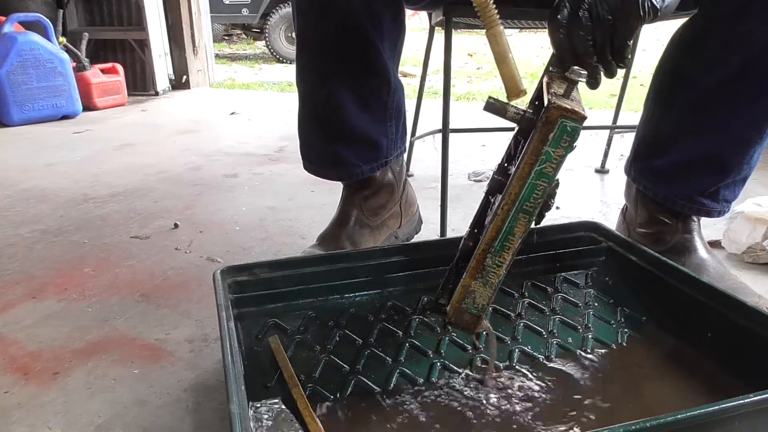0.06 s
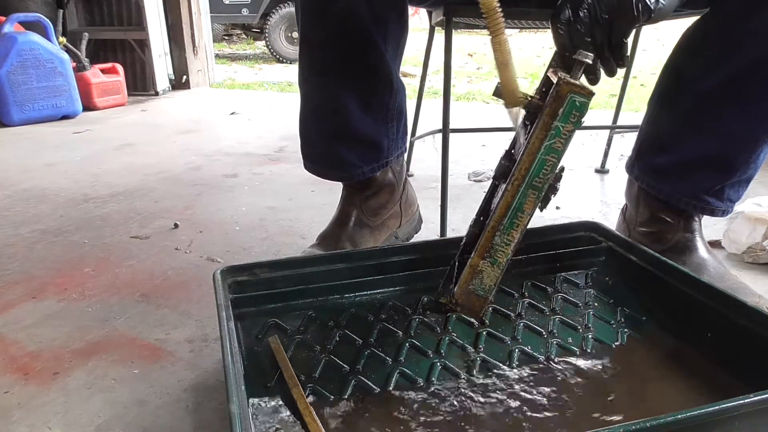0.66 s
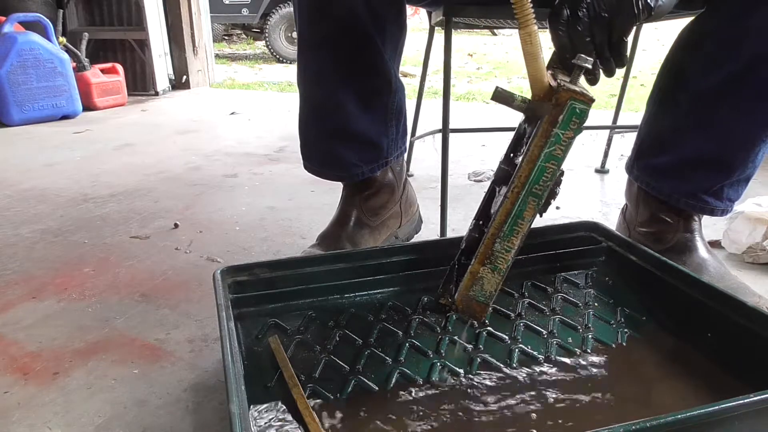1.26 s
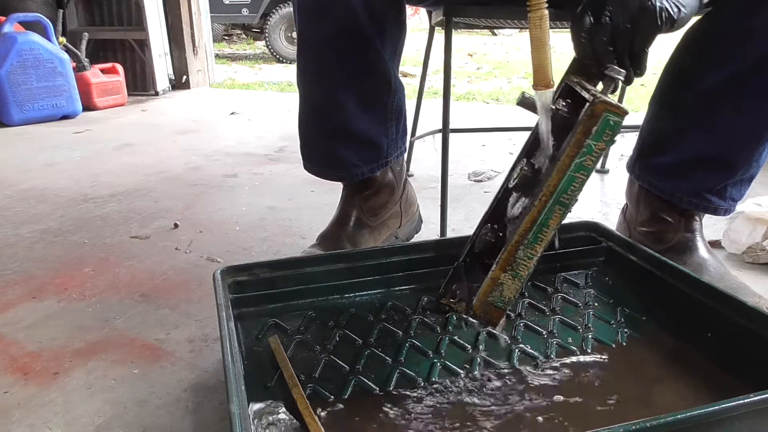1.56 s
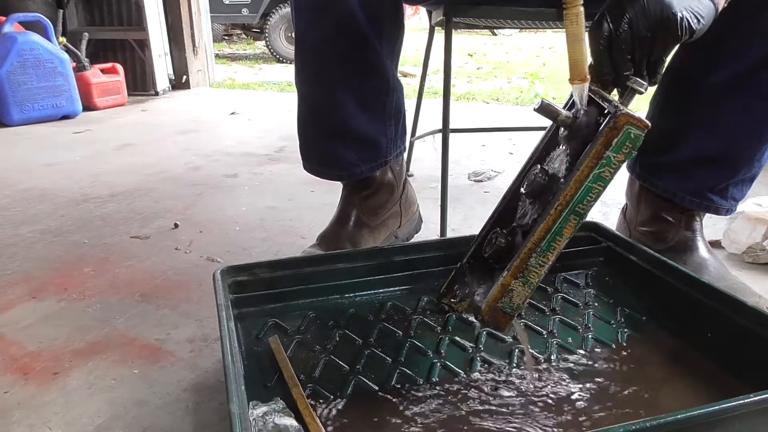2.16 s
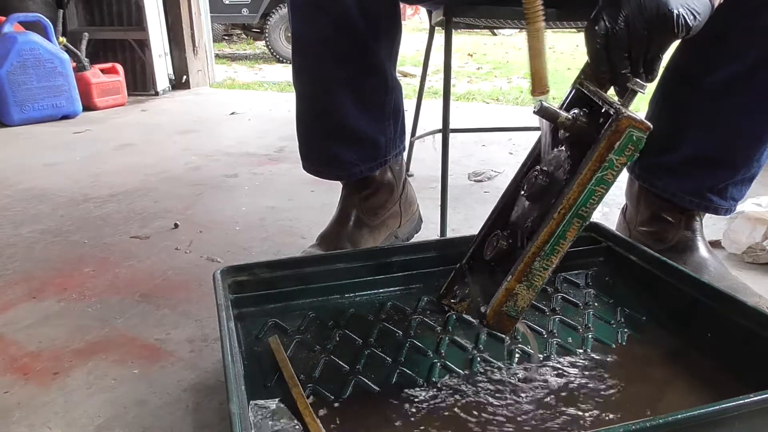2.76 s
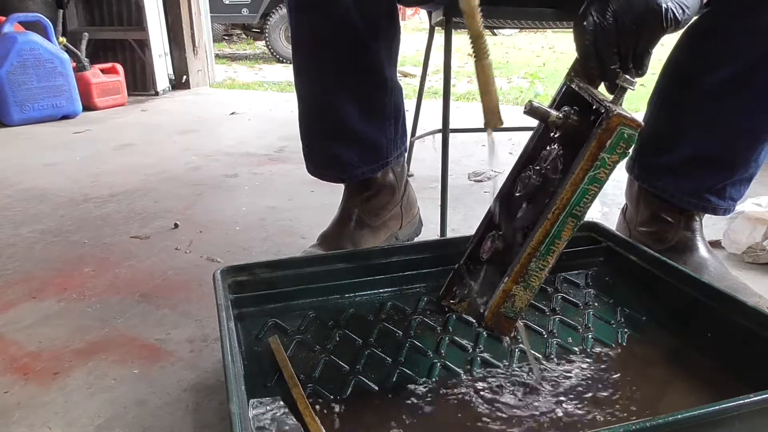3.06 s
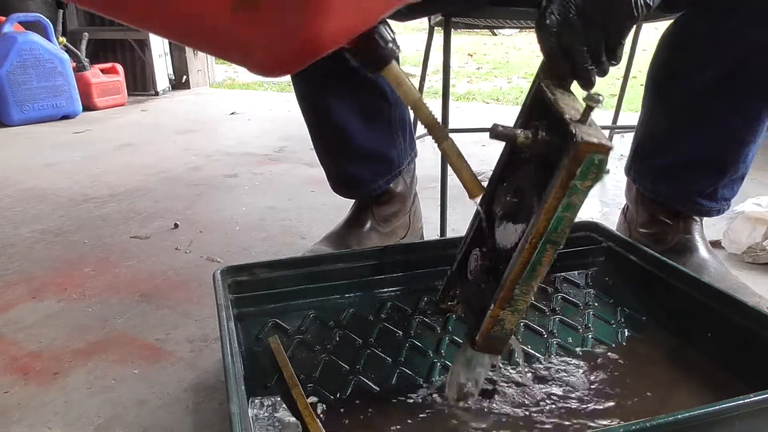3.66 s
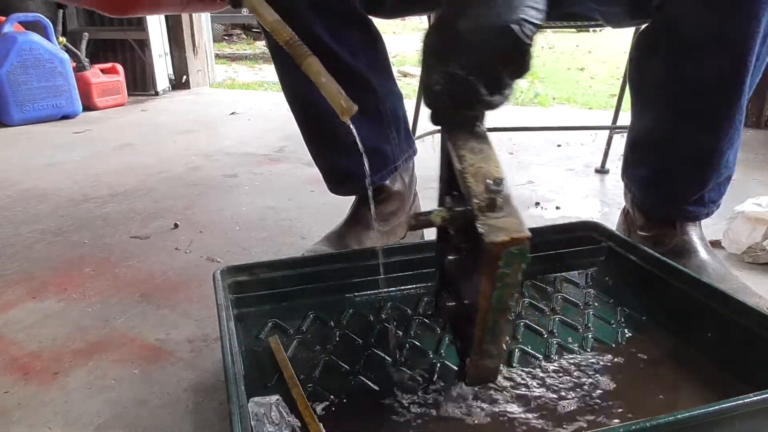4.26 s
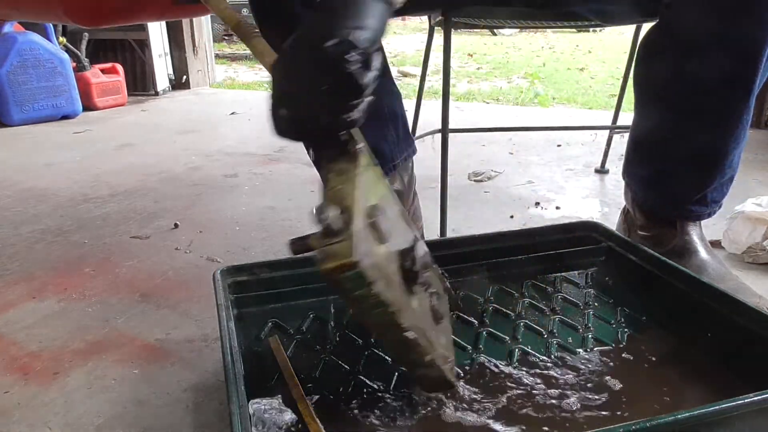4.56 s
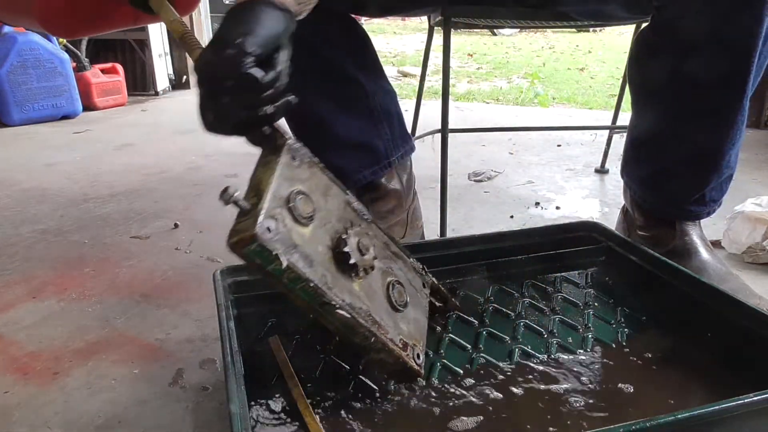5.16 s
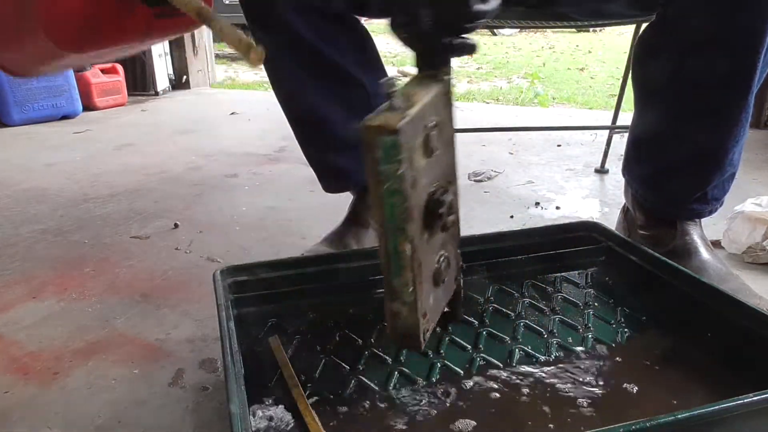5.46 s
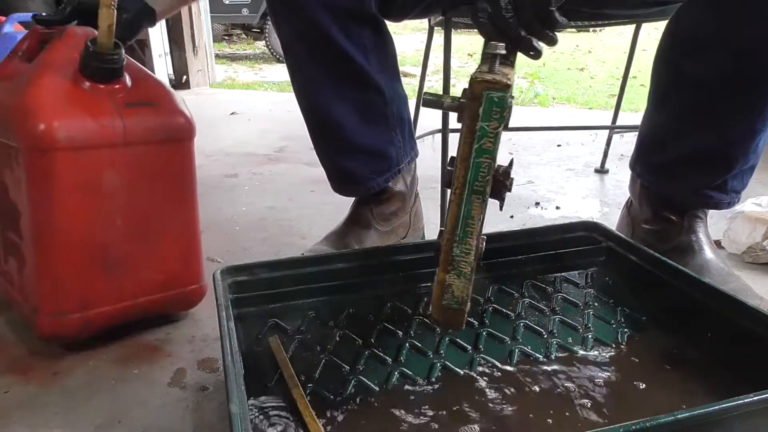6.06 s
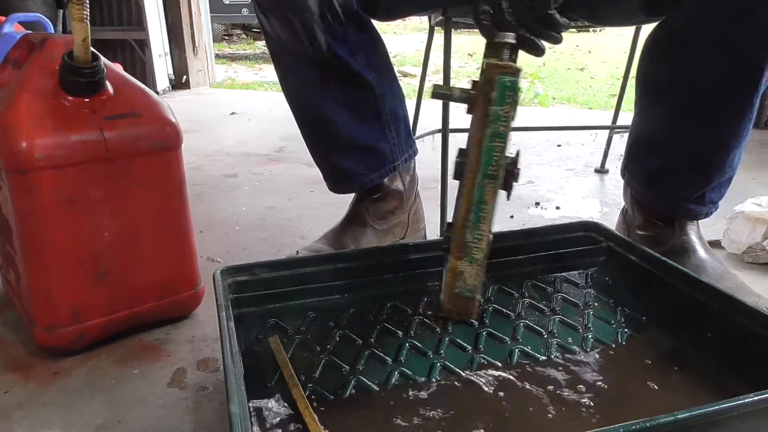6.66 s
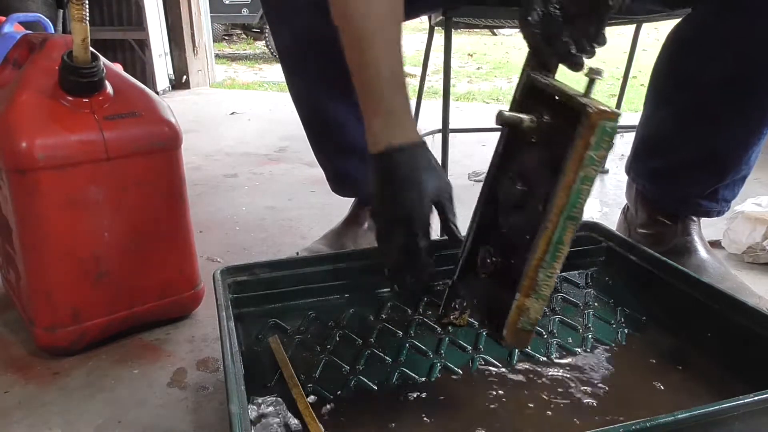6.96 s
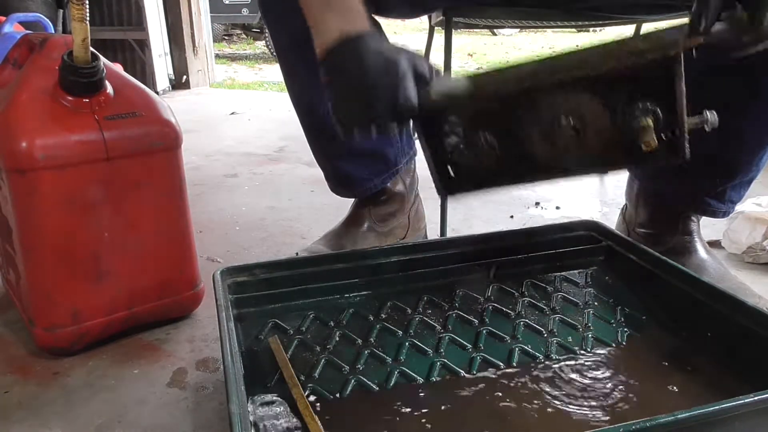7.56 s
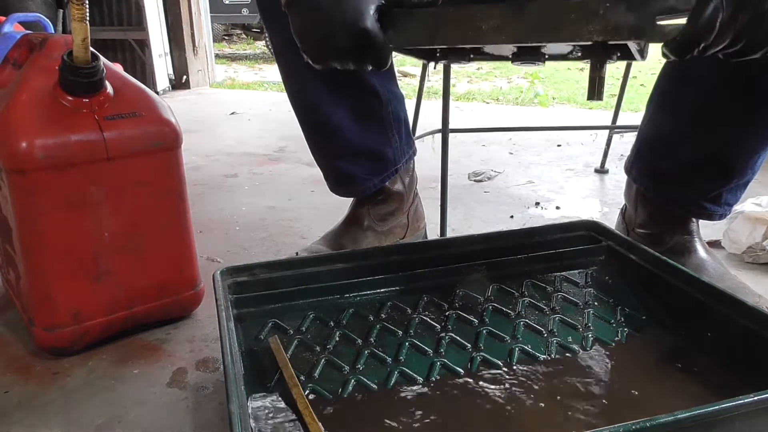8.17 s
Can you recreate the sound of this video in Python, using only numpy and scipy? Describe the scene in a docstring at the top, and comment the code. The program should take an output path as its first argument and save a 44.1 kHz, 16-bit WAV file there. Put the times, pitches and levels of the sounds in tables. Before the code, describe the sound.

From the start, solvent pours from a plastic can onto a steel plate and spatters into a plastic drain tray, close to the microphone in an open garage. The fine, bright splashing comes in uneven gushes with sharp little drips, and air glugs at about 1.2 seconds. Around 4 seconds the stream briefly drums on the plastic amid a few light knocks, then ends just before 5 seconds. The plate bumps the tray at 5.5 seconds. At 6 seconds the half-full can lands on gritty concrete with a loud, hollow clatter, rocking for half a second. Gloves and clothes rustle softly. The plate hits the tray with a loud knock and clink at 7.3 seconds, a drop plinks at 7.7, and another sharp knock comes at 8. A faint electrical hum, low outdoor air and a distant engine drone lie underneath throughout.

```python
"""Solvent runs from a plastic fuel can over a gearbox plate and spatters into a plastic drain tray.
Close to a stereo microphone in an open garage, it sprays, rings the steel and traps bubbles; air glugs
back into the can. The plate knocks the tray, gloves and clothes rub, and the can is set down on the
concrete with a hollow clatter. The garage answers faintly; mains hum and a far engine lie underneath."""
import sys
import numpy as np
from scipy import signal
from scipy.fft import rfft, irfft, next_fast_len
from scipy.io import wavfile
from scipy.ndimage import map_coordinates

SR = 44100
rng = np.random.default_rng(int(sys.argv[2]) if len(sys.argv) > 2 else 0)


def store_wav(level_fs):
    """Save 16-bit WAV to argv[1]."""
    pcm = np.round(np.clip(np.atleast_2d(level_fs), -1, 1) * 32767)
    wavfile.write(sys.argv[1], SR, pcm.T.astype(np.int16))


N = 371097
TIME_S = np.arange(N) / SR
HOLLOW_WIDTH, KNOCK_WIDTH, CAN_WIDTH, ROOM_WIDTH = 0.27, 0.55, 0.53, 0.88  # 0 is mono, 1 is full width
STREAM_ENDS_S = (4.83, 4.93)  # the last of the solvent thins out

# the steady stream, on the plate and in its hollow: time_s, spray_db, hollow_db
STREAM_LEVELS = [(0.0, -61.5, -71.5), (0.65, -66.5, -72.5), (1.13, -61.5, -70), (1.66, -60, -63.5),
                 (1.91, -53.5, -56.5), (2.12, -59.5, -61.5), (2.37, -59.5, -63.5), (2.99, -58, -63.5),
                 (3.4, -57, -58), (3.63, -61.5, -63.5), (3.82, -59.5, -60), (4.35, -65, -65.5),
                 (5.0, -70.5, -69)]
# gushes from the can: crest_s, rise_s, spray_lift_db, hollow_lift_db
STREAM_GUSHES = [(0.41, 0.029, 4.5, 1), (0.78, 0.02, 11, -3), (0.89, 0.035, 4.5, 2), (1.055, 0.0062, 9, -4),
                 (1.115, 0.028, 3.5, 5), (1.55, 0.033, 6.5, 6), (1.779, 0.03, 9, 6.5),
                 (1.95, 0.039, -1, -0.5), (2.07, 0.037, 3.5, 2.5), (2.3, 0.03, 7, 6), (2.387, 0.019, 9, 3),
                 (2.468, 0.031, 10, 6), (2.65, 0.049, 4.5, 6.5), (2.82, 0.079, 6, 1.5),
                 (2.92, 0.051, 4.5, 10.5), (3.04, 0.038, 6.5, 7.5), (3.24, 0.02, 4.5, -2),
                 (3.77, 0.047, 7.5, 1.5), (3.915, 0.03, 7, 3)]
# fine spray off the plate: frequency_hz, level_db
SPRAY_SPECTRUM = [(2200, -43), (3200, -13), (4600, -6.5), (6300, -5.5), (8100, 2.5), (10100, -0.5),
                  (11600, 0), (13600, -4), (15200, -16), (16000, -33)]
# the hollow of the gearbox housing: frequency_hz, level_db
HOLLOW_SPECTRUM = [(1400, -26), (1900, -12), (2150, 0), (2450, -8), (3150, 4), (3550, 2), (4050, 3),
                   (4900, 3.5), (6200, -15)]
# the churned pool in the tray: frequency_hz, level_db
POOL_SPECTRUM = [(190, -12), (320, -6), (390, -2.5), (520, -8), (680, -22.5), (980, -13.5), (1300, -9),
                 (1800, -19), (3000, -23), (5000, -31)]
def pour():
    """Close up, the stream sprays off the plate, slaps and rings its hollow and churns the pool."""
    # after each gush air re-enters the can and the stream slackens
    gushes = np.array([swell(s, rise, 1.18 * rise) - 0.31 * swell(s + 3 * rise, rise, rise)
                       for s, rise, _, _ in STREAM_GUSHES])
    lifts_db = np.transpose(STREAM_GUSHES)[2:] @ gushes
    spray_db, hollow_db = curves(STREAM_LEVELS) + lifts_db
    pool_db = -63.5 + 0.7 * (hollow_db - hollow_db.mean())
    fine = grain_pair(2470, 15700, life_cycles=65, spread_db=4, count=4200, size=400)
    inside = grain_pair(1550, 6140, life_cycles=65, spread_db=1.7, count=2100, size=800)
    coarse = grain_pair(353, 2950, life_cycles=24, spread_db=3, count=1500, size=1200)
    plinks = grains(876, 3430, life_cycles=45, spread_db=3.5, count=190, size=2000)  # single bubbles
    splats = grains(1300, 5130, life_cycles=22, spread_db=2, count=480, size=400)  # blobs on wet metal
    spray = unit(stereo(fine, SPRAY_SPECTRUM) + amp(1) * noise(SPRAY_SPECTRUM, N))
    hollow = stereo(inside, HOLLOW_SPECTRUM) + amp(1) * noise(HOLLOW_SPECTRUM, N)
    hollow = unit(narrowed(hollow, HOLLOW_WIDTH)) + amp(-9) * plinks + amp(-7) * splats
    pool = unit(stereo(coarse, POOL_SPECTRUM) + amp(-2.5) * noise(POOL_SPECTRUM, N))
    running = np.interp(TIME_S, STREAM_ENDS_S, [1, 0])
    spurts = amp(1.67 * wobble(30.095) + 2.07 * wobble(150))  # the stream breaks up into clusters
    splashing = amp(spray_db + 2.5) * spray + amp(hollow_db - 3) * hollow + amp(pool_db) * pool
    return running * spurts * splashing


# modes of the steel plate: pitch_hz, bandwidth_hz, level_db
PLATE_MODES = [(2117, 84, 3), (2285, 64, -2.5), (2940, 80, -4), (3870, 110, 2.5), (4150, 160, -0.5),
               (4580, 140, 0.5), (5120, 150, -9)]
# the plate's ring under the stream: time_s, level_db
PLATE_LEVELS = [(0.78, -86), (0.86, -62.5), (1.04, -68.5), (1.22, -65.5), (1.5, -64), (2.0, -68),
                (2.6, -70), (3.4, -64), (4.6, -79)]
def plate_ring():
    """The patter of the stream keeps a few damped modes of the plate ringing."""
    def resonances(f):
        return sum(amp(db) * 1j * f * width / (hz * hz - f * f + 1j * f * width)
                   for hz, width, db in PLATE_MODES)
    level_db, = curves(PLATE_LEVELS)
    patter = rng.standard_normal((2, N)) * amp(4.9 * wobble(110))
    return amp(level_db) * unit(narrowed(filtered(patter, resonances), HOLLOW_WIDTH))


# the biggest drops bursting on metal and liquid: start_s, level_db, pitch_hz
BIG_DROPS = [(0.004, -36, 8000), (0.0255, -38, 11200), (0.0463, -27, 8220), (0.215, -36.5, 6560),
             (0.237, -30.5, 7850), (0.318, -38, 7180), (0.3476, -42, 4700), (0.394, -44, 4360),
             (0.4274, -44, 4700), (0.4898, -38, 12000), (0.518, -33.5, 8950), (0.529, -37.5, 8300),
             (0.5661, -40.5, 10300), (1.0081, -39, 10800), (1.0949, -36, 4720), (1.1298, -39, 7720),
             (1.186, -36, 6150), (1.3972, -43, 3900), (1.428, -39, 9100), (1.5444, -37, 12300),
             (1.5843, -40, 11800), (1.7, -30.5, 9840), (1.722, -38, 3800), (1.725, -30.5, 3170),
             (1.741, -24.5, 8700), (1.7828, -33.5, 8980), (1.8315, -32, 8300), (1.844, -35, 2350),
             (1.8941, -28, 9220), (1.9165, -37, 2080), (1.944, -39, 3100), (1.9649, -37, 11200),
             (2.0186, -38, 3750), (2.0797, -34, 11900), (2.221, -37.5, 4420), (2.2338, -36, 4370),
             (2.3735, -38, 8500), (2.5077, -39, 7020), (2.5477, -38, 9550), (2.7685, -27.5, 11600),
             (2.8095, -39, 11800), (2.9534, -39, 5600), (3.0447, -43, 5300), (3.0584, -37, 5160),
             (3.0764, -33.5, 7200), (3.1383, -33, 7490), (3.1672, -37, 7890), (3.2012, -25, 8430),
             (3.223, -32, 4450), (3.284, -31, 5100), (3.3662, -35.5, 8140), (3.467, -33, 1680),
             (3.5189, -34, 8000), (3.7429, -30.5, 7770), (3.7594, -34, 8490), (3.8572, -30.5, 8280),
             (3.859, -30.5, 3800), (3.9028, -39.5, 1630), (4.028, -27.5, 7280), (4.0951, -31.5, 11300),
             (4.15, -35, 13300), (4.183, -37.5, 4800), (4.2368, -33.5, 2040), (4.284, -43, 8350),
             (4.3345, -43, 3620), (4.3605, -39, 11600), (4.3965, -26.5, 11460), (4.694, -39, 4030),
             (4.715, -27, 7840), (7.681, -29, 12350)]
def drops():
    """Each drop ticks on contact, swells into a short, pitched splat and traps a tiny ringing bubble."""
    out, t = np.zeros((2, N)), np.arange(SR // 16) / SR
    onset = 1 - np.exp(-t / 0.0013)
    for s, db, hz in BIG_DROPS:
        splat_spectrum = [(hz / 4, -26), (hz / 1.27, -14), (hz, 0), (hz * 1.4, -12), (hz * 3, -26)]
        splat = amp(-8.5) * fade(t, 0.037) * noise(splat_spectrum, len(t))
        ping = amp(1) * damped_sine(t, hz, 0.01)
        tick = amp(-13.5) * fade(t, 0.0063) * noise([(hz / 5, -10), (hz, 0), (hz * 3, -8)], len(t))
        pan_db = 2.5 * rng.standard_normal()
        add(out, s, amp(db) * pan(pan_db) * (tick + onset * (splat + ping)))
    return out


# large air bubbles in the can and the pool: start_s, level_db, pitch_hz, rise_ratio
AIR_BUBBLES = [(0.085, -35.5, 711, .05), (0.187, -43, 408.5, .05), (1.191, -35.5, 483, 0.046),
               (1.21, -34, 479, 0.046), (1.244, -36.5, 484, 0.044), (1.294, -37.5, 493, .05),
               (1.35, -39.5, 714, .1), (2.27, -56, 1005, 0.045), (2.329, -49.5, 1040, .05),
               (2.342, -50, 1850, 0.12), (2.685, -49.5, 816, 0.57), (2.705, -51, 920, .45),
               (2.726, -50, 1025, 0.41), (7.691, -41.5, 1090, 0.043), (7.717, -57, 1070, .05)]
def glugs():
    """Big bubbles ring with a rising pitch over a soft slosh."""
    out, t = np.zeros((2, N)), np.arange(SR // 5) / SR
    slosh_spectrum = [(60, -28), (140, 10.5), (300, 2.5), (750, -1.5), (1000, -19.5), (4000, -24.5),
                      (12000, -26)]
    for s, db, hz, rise in AIR_BUBBLES:
        t60 = 0.15 * (500 / hz) ** 0.68  # smaller, higher bubbles die sooner
        slosh = (1 - np.exp(-t / 0.0047)) * fade(t, 0.18) * noise(slosh_spectrum, len(t))
        add(out, s, amp(db + 0.5) * bubble(hz * t, hz * t60, rise) + amp(db - 1.5) * slosh)
    return out


# the wet tray under the stream: frequency_hz, level_db
DRUMMING_SPECTRUM = [(150, -25), (300, -12), (400, 8.5), (520, -14), (800, -7), (1300, -18), (2500, -23),
                     (6000, -45)]
def drumming():
    """The stream briefly misses the plate and its blobs beat on the wet plastic."""
    blobs = grain_pair(250, 2260, life_cycles=11, spread_db=4, count=2500, size=1500)
    return amp(-47) * swell(crest_s=4.18, rise_s=0.11, fall_s=0.11) * stereo(blobs, DRUMMING_SPECTRUM)


# the plate and heavy splashes striking the tray: start_s, level_db, brightness_db_per_octave, click_db
TRAY_BLOWS = [(2.575, -40, -8, -68), (2.848, -37, 5.5, -60), (4.093, -30, 2.5, -49), (4.112, -41, -9, -72),
              (4.168, -38.5, -4, -51), (4.261, -44.5, -12, -47.5), (4.312, -40, -5, -69),
              (4.398, -41.5, 0.5, -50), (5.497, -24.5, -4.5, -58), (6.705, -35, -13, -77),
              (6.747, -37, -15, -76), (7.129, -56, -4, -47.5), (7.2904, -22.5, 2, -55),
              (7.309, -18, 0.5, -47), (7.319, -23, -7, -56), (7.356, -38.5, 9.5, -52),
              (8.0192, -20, -2, -39), (8.047, -34.5, 3, -59)]
# modes of the tray with its grating: pitch_hz, level_db, t60_s
TRAY_MODES = [(249.2, -2, 0.18), (313.5, 0.5, 0.09), (389.5, 3, 0.12), (431, -6, 0.11), (473.5, -11, 0.18),
              (614, -7, 0.093), (943, -7, 0.083), (1121, -12.5, 0.041), (1270, -3, 0.031),
              (2070, -19.5, 0.056), (2810, -32, 0.02)]
# the thud of the plastic: frequency_hz, level_db
THUD_SPECTRUM = [(80, -37), (250, -5.5), (450, 10.5), (650, -4), (900, -6), (1400, -19), (2200, -24.5),
                 (8000, -44)]
# hard contact, on the tray or on grit: frequency_hz, level_db
CLICK_SPECTRUM = [(500, 12.5), (1500, 4.5), (2400, -1.5), (3800, 7), (6000, -3.5), (7600, 6.5), (9500, 6.5),
                  (11800, 1.5), (14000, -9), (16000, -24)]
def tray_knocks():
    """A short thud and a contact click, then the tray's damped ring, coloured by where it is struck."""
    out, t = np.zeros((2, N)), np.arange(SR // 4) / SR
    give = 1 - np.exp(-(t / 0.00054) ** 2)  # the plastic yields before it rings
    for s, db, brightness, click_db in TRAY_BLOWS:
        colour = [(hz, brightness * np.log2(hz / 400)) for hz in (250, 800)]
        thud = filtered(noise(THUD_SPECTRUM, len(t)), lambda hz: amp(along(colour, hz)))
        body = amp(-11) * ring(TRAY_MODES, t, colour) + amp(-1) * fade(t, 0.025) * thud
        click = amp(click_db) * fade(t, 0.057) * noise(CLICK_SPECTRUM, len(t))
        add(out, s, amp(db) * give * body + click)
    return out


# strikes on the wet steel, by the spout, the hand or the stream itself: start_s, level_db, pitch_hz, t60_s
PLATE_STRIKES = [(0.853, -50.5, 3920, 0.09), (0.895, -50, 3960, 0.06), (0.92, -54, 2170, 0.057),
                 (1.0, -54, 2200, 0.06), (1.223, -38.5, 2270, 0.041), (1.346, -46, 1950, 0.056),
                 (4.470, -30, 2160, 0.024), (7.2893, -38.5, 4050, 0.044), (7.3005, -41, 2900, 0.036),
                 (7.308, -37.5, 8700, 0.011), (7.684, -33.5, 5120, 0.01)]
def plate_clinks():
    """A hard strike, of the spout, the hand or the stream, rings one mode of the steel, which soon dies away."""
    out, t = np.zeros((2, N)), np.arange(SR // 8) / SR
    touch_spectrum = [(300, -6), (700, 5.5), (3500, -4.5), (6000, -13.5), (15000, -14)]
    for s, db, hz, t60 in PLATE_STRIKES:
        touch = amp(-8) * fade(t, 0.061) * noise(touch_spectrum, len(t))
        add(out, s, amp(db) * (damped_sine(t, hz, t60) + touch))
    return out


# the can landing and rocking on its edges: start_s, wall_db, clack_db, boom_db, body_db, grit_db
CAN_LANDINGS = [(6.0126, -17.5, -26.5, -13, -23.5, -20.5, ), (6.0166, -28, -38, -45, -46, -20),
                (6.091, -23.5, -30.5, -23.5, -25.5, -28.5), (6.1517, -30, -32, -42, -37, -50),
                (6.167, -38, -54, -35, -40, -39), (6.188, -38, -35, -50, -50, -40),
                (6.196, -24.5, -33.5, -24, -26.5, -31.5), (6.3006, -20.5, -25.5, -38, -24, -16.5),
                (6.319, -23, -44, -47, -21, -48), (6.350, -30, -38, -29, -26.5, -29),
                (6.3699, -38, -55, -45, -45, -30), (6.3746, -24, -34.5, -45, -28, -41),
                (6.386, -27, -43, -51, -30, -46), (6.416, -36, -51, -48, -40, -48),
                (6.448, -30, -42, -40, -38, -50), (6.474, -29, -50, -43, -30.5, -44),
                (6.505, -37, -43.5, -48, -48, -38.5)]
# two beating, bulging modes of the broad walls, before the can settles: pitch_hz, level_db, t60_s
BOOM_MODES = [(92.5, -2, 0.43), (119.5, -1, 0.68)]
# higher modes of the half-full can: pitch_hz, level_db, t60_s
CAN_MODES = [(139.3, -3, 0.3), (152.4, -6.5, 0.17), (178, -1.5, 0.28), (221, 0, 0.16), (251.6, -5, 0.29),
             (284, -3, 0.147), (348, -10.5, 0.39), (381, -19, 0.55), (456, -11, 0.18), (480, -6.5, 0.19),
             (583, -9.5, 0.32), (702, -15, 0.43), (784, -7.5, 0.16), (925, -8, 0.22), (1032, -13, 0.16),
             (1173, -7, 0.1), (1470, -5, 0.088), (2143, -12, 0.071)]
# the rattle of its walls: frequency_hz, level_db
WALL_SPECTRUM = [(25, -40), (65, 3), (120, -1), (220, 0), (480, 4), (750, -6.5), (1400, -25), (1900, -25),
                 (2800, -29), (4000, -30), (10000, -46)]
def can_clatter():
    """Nearby, the hollow can booms or rattles according to which edge meets the gritty concrete."""
    out, t = np.zeros((2, N)), np.arange(SR * 3 // 4) / SR
    onset = 1 - np.exp(-t / 0.005)
    settled_s = 6.27  # standing on the floor, the can booms lower and shorter
    clack_spectrum = [(500, -17), (1000, 10.5), (1400, 6), (1900, -16), (2800, -14), (4000, -7.5),
                      (9000, -29)]
    for s, wall_db, clack_db, boom_db, body_db, grit_db in CAN_LANDINGS:
        scale = 1 if s < settled_s else 0.74
        boom = sum((-1) ** k * amp(boom_db + db) * damped_sine(t, hz * scale, t60 * scale)
                   for k, (hz, db, t60) in enumerate(BOOM_MODES))
        colour = [(220, body_db), (450, body_db - 6), (750, wall_db - 10.5), (1100, clack_db - 6.5)]
        body = ring(CAN_MODES, t, colour)
        wall = amp(wall_db - 5) * fade(t, 0.18) * noise(WALL_SPECTRUM, len(t))
        clack = amp(clack_db) * fade(t, 0.066) * noise(clack_spectrum, len(t))
        crunch = amp(grit_db - 17) * fade(t, 0.077) * noise(CLICK_SPECTRUM, len(t))
        add(out, s, onset * (boom + body) + wall + clack + crunch)
        add(out, s, amp(grit_db) * grit_crack())
    return out


def grit_crack(size=1024):
    """Grit cracks under the can: a very short snap without pitch."""
    envelope = fade(np.arange(size) / SR, t60=0.013)
    phases = np.angle(rfft(envelope * rng.standard_normal((2, size)), 2 * size))
    flat_snap = irfft(np.exp(1j * phases))[:, :size]
    return stereo(flat_snap, CLICK_SPECTRUM) * np.sqrt(np.mean(envelope ** 2))


# clothes and gloves rubbing as the can and plate are moved: crest_s, half_length_s, level_db, treble_db
CLOTH_STROKES = [(5.05, 0.15, -69, -4), (5.488, 0.023, -65.5, 9), (5.62, 0.11, -63, -5),
                 (5.81, 0.17, -56, -1), (5.871, 0.021, -56.5, -2), (6.857, 0.058, -64, -10),
                 (7.1, 0.41, -59.5, 0), (7.453, 0.039, -62.5, 9.5), (7.544, 0.12, -60, 8),
                 (7.774, 0.22, -62, 2), (7.97, 0.22, -63, -10), (8.044, 0.018, -60, 18)]
# sliding cloth: frequency_hz, level_db
CLOTH_SPECTRUM = [(530, -19), (900, -2), (1030, -16), (1130, -2.5), (1550, -7), (1950, -10), (2540, -9.5),
                  (3960, -7), (5750, -13.5), (7860, -7), (13200, -10.5), (16000, -39)]
# the glove sliding along the lifted plate: frequency_hz, level_db
GLOVE_SPECTRUM = [(700, -32), (1050, -2), (1250, 0), (1600, -19), (4000, -12), (9000, -40)]
def rustle():
    """Cloth rubs faintly throughout, its tiny creases snapping, and slides in strokes after the pour."""
    creases = grain_pair(1040, 9100, life_cycles=9.6, spread_db=3, count=1500, size=260)
    cloth = unit(noise(CLOTH_SPECTRUM, N) + amp(-8) * stereo(creases, CLOTH_SPECTRUM))
    treble = filtered(cloth, lambda hz: hz ** 4 / (hz ** 4 + 6000 ** 4))
    fidget = amp(-68) * np.interp(TIME_S, STREAM_ENDS_S, [0.6, 1]) * cloth
    strokes = sum(amp(db - 3) * swell(s, half_s, half_s) * (cloth + (amp(treble_db) - 1) * treble)
                  for s, half_s, db, treble_db in CLOTH_STROKES)
    glove = amp(-51) * swell(crest_s=7.57, rise_s=0.036, fall_s=0.036) * noise(GLOVE_SPECTRUM, N)
    return amp(1.74 * wobble(54)) * (fidget + strokes + glove)


# decay of the open garage: frequency_hz, t60_s
GARAGE_DECAY = [(100, 0.95), (500, 0.31), (3000, 0.87), (8000, 0.85), (15000, 0.93)]
def garage(x):
    """The room's answer reaches the microphone 8 ms late, each frequency dying at its own speed."""
    hz, t, bands = signal.stft(rng.standard_normal((2, SR)), SR, nperseg=256)
    tail = signal.istft(bands * fade(t, along(GARAGE_DECAY, hz)[:, None]), SR, nperseg=256)[1]
    tail = stereo(tail, [(100, 3), (400, 6), (1000, 2), (4000, 3.5), (8000, 2), (15000, -3)])
    late = np.pad(x.mean(axis=0), (round(0.008 * SR), 0))
    return signal.fftconvolve(late[None], tail / np.linalg.norm(tail[0]), axes=1)[:, :N]


# the far engine's speed: time_s, firing_hz
ENGINE_SPEED = [(0, 80.6), (2.7, 80.76), (3.6, 76.44), (4.4, 74), (5.7, 74.96), (7, 71.94), (8.41, 71.66)]
# its drone swelling and fading: time_s, fundamental_db, overtone_db
ENGINE_LEVELS = [(0, -68, -71), (1, -61.5, -48), (2.2, -49.5, -63.5), (2.7, -68, -51.5), (3.3, -63, -43.5),
                 (4.7, -59.5, -48.5), (5.9, -48.5, -44.5), (7, -46.5, -48), (8.41, -58, -62.5)]
# overtones of its firing: multiple, level_db
ENGINE_OVERTONES = [(2, -2.5), (3, -14), (4, -19), (5, -22.5)]
def far_engine():
    """An engine drones in the distance and slows a little under load."""
    firing_hz, = curves(ENGINE_SPEED)
    fundamental_db, overtone_db = curves(ENGINE_LEVELS)
    phase = 2 * np.pi * np.cumsum(firing_hz) / SR + 0.08 * wobble(12)
    overtones = sum(amp(db + wobble(2.11)) * np.sin(k * phase) for k, db in ENGINE_OVERTONES)
    return amp(fundamental_db) * np.sin(phase) + amp(overtone_db) * overtones


# electrical hum in the garage: pitch_hz, level_db
HUM_TONES = [(60, -61.5), (120, -57.5), (197, -61), (295, -95)]
def mains_hum():
    """Low electrical tones hold their pitch while each wavers in level."""
    return sum(amp(db + 2.5 * wobble(3.5)) * np.sin(2 * np.pi * hz * TIME_S) for hz, db in HUM_TONES)


# the air outside the garage: frequency_hz, level_db
AIR_SPECTRUM = [(15, -53), (25, -24), (59, -10.5), (149, -5), (293, -7), (326, -15), (363, -8),
                (427, -13.5), (560, -16.5), (1020, -24), (1190, -25), (1790, -39.5), (2760, -33),
                (3250, -64), (16000, -41.5)]
def outdoor_air():
    """A low, steady rush comes in from outdoors."""
    return amp(-52) * noise(AIR_SPECTRUM, N)


# likeness of the microphone's two channels: frequency_hz, correlation
CHANNEL_LIKENESS = [(100, 0.9), (200, 0.89), (350, 0.8), (800, 0.45), (2500, 0.47), (5000, 0.51),
                    (7500, 0.46), (10000, -0.071), (12500, 0.24)]
def stereo(pair, spectrum):
    """Colour two unrelated signals and blend them to left and right: bass alike, treble wide."""
    def blend(hz):
        angle = np.arccos(np.clip(along(CHANNEL_LIKENESS, hz), -1, 1)) / 2
        return amp(along(spectrum, hz)) * [np.cos(angle), np.sin(angle)]
    mid, side = filtered(pair, blend)
    return unit(np.array([mid + side, mid - side]))


def noise(spectrum, size):
    """Coloured stereo noise of rms 1."""
    return stereo(rng.standard_normal((2, size)), spectrum)


def narrowed(x, width):
    """Draw left and right towards their middle."""
    return x.mean(axis=0) + width * (x - x.mean(axis=0))


def pan(left_over_right_db):
    """Left and right gains for a level difference."""
    return amp(np.vstack([left_over_right_db, -left_over_right_db]) / 2)


def panned(x, balance):
    """Lean each frequency to the left or right."""
    return filtered(x, lambda hz: pan(along(balance, hz)))


def bubble(cycles, life_cycles, rise):
    """A bubble's ring over its own cycle count: it starts softly and climbs in pitch as it dies."""
    envelope = (1 - np.exp(-2 * cycles)) * fade(cycles, life_cycles)
    return envelope * np.sin(2 * np.pi * cycles * (1 + rise * cycles / life_cycles / 2))


def grains(low_hz, high_hz, life_cycles, spread_db, count, size):
    """A steady shower of small, bubble-like pings of random pitch and strength, rms 1."""
    when, pitch, strength = rng.random((count, 3)).T[:, :, None]
    hz = low_hz * (high_hz / low_hz) ** pitch
    gain = amp(spread_db * np.minimum(-np.log(1 - strength), 4))
    pings = gain * np.sqrt(hz) * bubble(hz * np.arange(size) / SR, life_cycles, rise=0.03)
    positions = (when * N).astype(int) + np.arange(size)
    return unit(np.bincount(positions.ravel(), pings.ravel(), N)[:N])


def grain_pair(low_hz, high_hz, **settings):
    """Two unrelated showers of grains."""
    return np.array([grains(low_hz, high_hz, **settings) for _ in range(2)])


def ring(modes, t, colour, scatter_db=2, detune=0.01):
    """Damped modes, struck at new strengths and slightly new pitches each time."""
    out = np.zeros(len(t))
    for k, (hz, db, t60) in enumerate(modes):
        gain = amp(db + along(colour, hz) + scatter_db * rng.standard_normal())
        pitch_hz = hz * (1 + detune * rng.standard_normal())
        out += (-1) ** k * gain * damped_sine(t, pitch_hz, t60)
    return out


def damped_sine(t, hz, t60):
    """One dying tone."""
    return fade(t, t60) * np.sin(2 * np.pi * hz * t)


def fade(t, t60):
    """Exponential decay, 60 dB down at t60."""
    return np.exp(-np.log(1000) * t / t60)


def swell(crest_s, rise_s, fall_s):
    """A smooth hump of height 1."""
    t = TIME_S - crest_s
    return np.exp(-(t / np.where(t < 0, rise_s, fall_s)) ** 2)


def wobble(rate):
    """A smooth random curve, rate knots a second."""
    return map_coordinates(rng.standard_normal(int(N * rate / SR) + 4), [TIME_S * rate])


def curves(rows):
    """One value per sample for each column after the time."""
    times, *columns = np.transpose(rows)
    return np.array([np.interp(TIME_S, times, column) for column in columns])


def along(points, hz):
    """Read (frequency_hz, value) points on a log axis."""
    frequencies, values = np.transpose(points)
    return np.interp(np.log(hz + 1), np.log(frequencies + 1), values)


def filtered(x, response):
    """Shape x by a response of frequency."""
    size = next_fast_len(x.shape[-1] + 8192)
    return irfft(rfft(x, size) * response(np.fft.rfftfreq(size, 1 / SR)), size)[..., :x.shape[-1]]


def add(track, start_s, sound):
    """Mix a sound into the track."""
    part = track[:, round(start_s * SR):][:, :sound.shape[-1]]
    part += sound[..., :part.shape[1]]


def amp(db):
    """Decibels to gain."""
    return 10 ** (np.asarray(db) / 20)


def unit(x):
    """Scale to rms 1."""
    return x / np.sqrt(np.mean(x ** 2) + 1e-20)


# where the splashing sits at the microphone: frequency_hz, left_over_right_db
LIQUID_BALANCE = [(300, -6.5), (1300, -1), (4400, -1), (8000, 1.5), (11000, -6.5), (15000, -5)]
# where the can sits: frequency_hz, left_over_right_db
CAN_BALANCE = [(60, 0.5), (150, -0.5), (380, 0.5), (950, 1), (2380, 1.0), (5980, 3), (15000, -4)]
def scene():
    """Liquid, knocks and the can are close by and narrower than the air; the garage answers faintly."""
    liquid = panned(pour() + plate_ring() + drops(), LIQUID_BALANCE) + glugs()
    tray = narrowed(tray_knocks() + drumming(), KNOCK_WIDTH)
    clinks = narrowed(plate_clinks(), KNOCK_WIDTH)
    can = narrowed(can_clatter(), CAN_WIDTH)
    into_room = amp(-19) * liquid + amp(-14) * tray + amp(-20) * clinks + amp(-10.5) * can
    room = narrowed(garage(into_room), ROOM_WIDTH)
    close = liquid + pan(-1.8) * (tray + clinks) + panned(can, CAN_BALANCE) + pan(-1.6) * rustle()
    return close + room + far_engine() + mains_hum() + outdoor_air()


def record(dry):
    """The microphone sheds the deepest bass and keeps nothing above its band limit."""
    low_cut_hz, top_hz = 46, 16100
    def response(hz):
        low_cut = (1j * hz) ** 2 / (low_cut_hz ** 2 - hz ** 2 + 1j * np.sqrt(2) * low_cut_hz * hz)
        return low_cut * (hz < top_hz)
    return filtered(dry, response)


dry = scene()
out = record(dry)
store_wav(out)
```